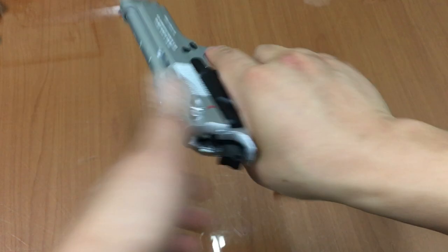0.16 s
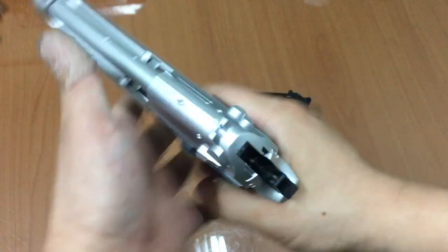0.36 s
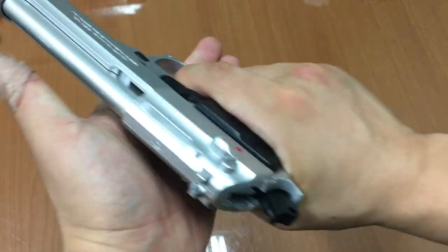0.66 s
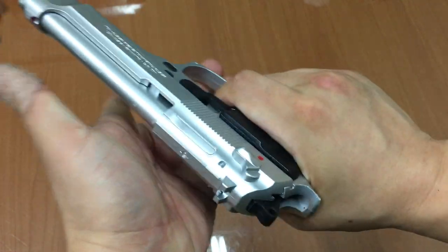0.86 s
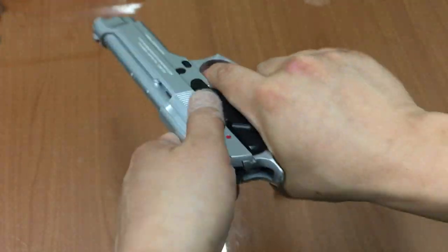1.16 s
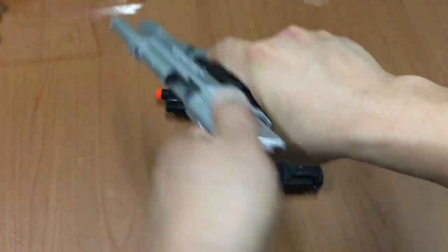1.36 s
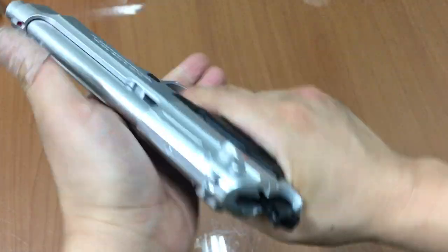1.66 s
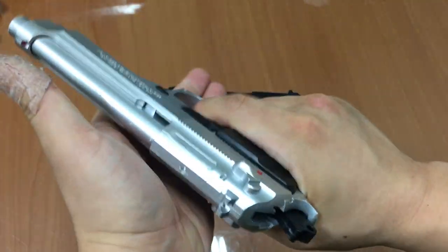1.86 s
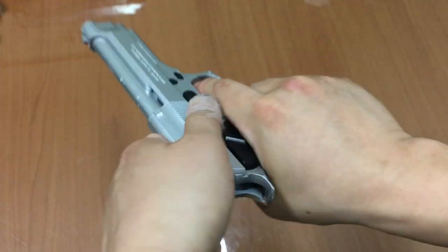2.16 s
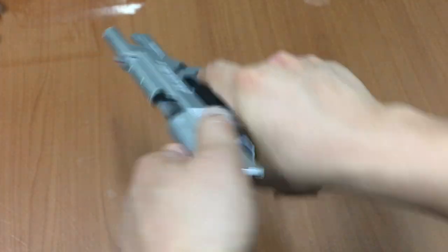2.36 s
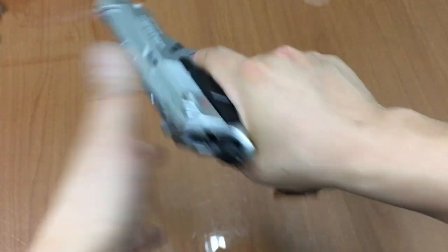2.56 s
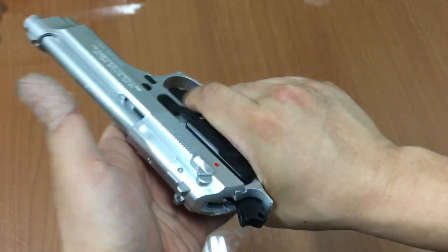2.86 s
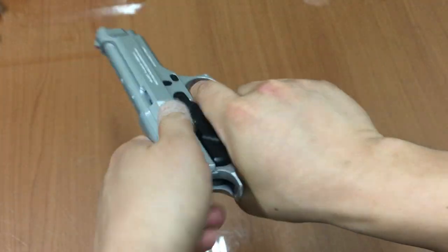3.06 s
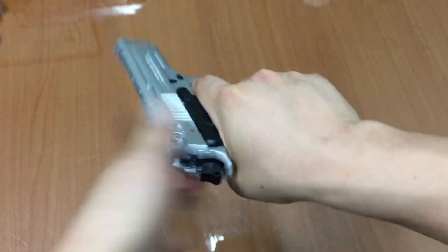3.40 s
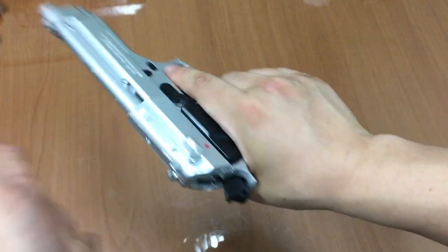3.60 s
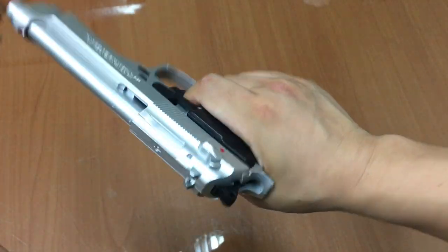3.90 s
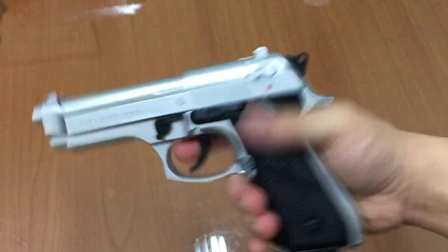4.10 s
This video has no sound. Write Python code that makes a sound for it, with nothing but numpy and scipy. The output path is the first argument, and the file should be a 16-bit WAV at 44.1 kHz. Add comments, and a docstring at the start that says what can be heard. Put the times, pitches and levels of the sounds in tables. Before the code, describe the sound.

Close sharp plastic clacks: slide dragged back, slammed forward, then a trigger click and hammer snap, repeated four times in about four seconds.

```python
"""Spring pistol over a table

A plastic spring airsoft pistol is worked over a table in a small, hard room, close to a camera's microphone.
Four times the slide is dragged back (cocking click, rear stop), slams home, and the trigger drops the hammer.
Contacts ring decaying modes under noise cracks; rubbing is a stream of clicks; hands and room are shaped noise.
The camera's limiter flattens the big clacks and its gain control ducks the room behind them.
"""
import sys
import numpy as np
from scipy import signal
from scipy.fft import rfft, irfft, next_fast_len
from scipy.io import wavfile
from scipy.ndimage import uniform_filter1d, minimum_filter1d, map_coordinates

SR = 44100
rng = np.random.default_rng(int(sys.argv[2]) if len(sys.argv) > 2 else 0)


def unload_audio(sound):
    """Save the sound as a 16-bit wav file, at the path given as the first command line argument."""
    columns = np.transpose(np.atleast_2d(sound))
    # keep every value between -1 and 1, then stretch to whole-number steps
    steps = np.round(np.clip(columns, -1, 1) * 32767)
    wavfile.write(sys.argv[1], SR, steps.astype(np.int16))


N = 187067


def amp(db):
    """Decibels to gain."""
    return 10 ** (np.asarray(db) / 20)


def unit(x):
    """Scaled to rms 1."""
    return x / np.sqrt(np.mean(x ** 2) + 1e-20)


def along(points, hz):
    """Reads (pitch_hz, value) points on a logarithmic pitch axis."""
    point_hz, value = np.transpose(points)
    return np.interp(np.log(hz + 1), np.log(point_hz + 1), value)


def wobble(knots_per_s):
    """A smooth random curve through evenly spaced random knots."""
    knots = rng.standard_normal(int(N * knots_per_s / SR) + 4)
    return map_coordinates(knots, [np.arange(N) * knots_per_s / SR])


def coloured(x, spectrum, size):
    """Filters x to a spectral colour and scales it to rms 1."""
    m = next_fast_len(size)
    gain = amp(along(spectrum, np.fft.rfftfreq(m, 1 / SR)))
    return unit(irfft(rfft(x, m) * gain, m)[:size])


def noise(spectrum, size):
    """Noise of rms 1 with the given colour."""
    return coloured(rng.standard_normal(next_fast_len(size)), spectrum, size)


def add(track, start_s, sound):
    """Mixes a sound into the track at its start time."""
    i = max(0, round(start_s * SR))
    track[i:i + len(sound)] += sound[:max(0, len(track) - i)]


# How long the small room rings at each pitch: pitch_hz, t60_s
ROOM_DECAY = [(300, 0.12), (1000, 0.2), (2000, 0.28), (3200, 0.33), (5000, 0.35), (7000, 0.34),
              (11000, 0.31), (16000, 0.24)]
# How strongly the walls answer at each pitch, relative: pitch_hz, level_db
ROOM_TONE = [(200, 5), (900, 4.5), (2000, 4.5), (7000, 0.5), (16000, 0.5)]


def in_room(x, wet_db, build_s=0.0048):
    """The direct sound plus a diffuse tail that builds up as the walls answer."""
    hz, t, z = signal.stft(rng.standard_normal(SR // 2), SR, nperseg=256)
    decay_db = -60 * t / along(ROOM_DECAY, hz)[:, None]
    gain = amp(along(ROOM_TONE, hz)[:, None] + decay_db)
    tail = signal.istft(z * gain, SR, nperseg=256)[1]
    tail *= 1 - np.exp(-(np.arange(len(tail)) / SR / build_s) ** 2)
    response = amp(wet_db) * tail / np.linalg.norm(tail)
    response[0] += 1  # direct sound
    return signal.fftconvolve(x, response)


def ringing(modes, t, rattle_hz):
    """A part's modes, struck at new strengths; loose parts rattle against it and roughen each line."""
    hz, mode_db, t60_s = np.transpose(modes)[:, :, None]
    strength = amp(mode_db + 2 * rng.standard_normal(hz.shape))
    # a random walk of phase broadens each line to rattle_hz
    steps = rng.standard_normal((len(modes), len(t)))
    drift = np.sqrt(2 * np.pi * rattle_hz / SR) * np.cumsum(steps, axis=1)
    phase = 2 * np.pi * (hz * t + rng.random(hz.shape)) + drift
    lines = strength * amp(-60 * t / t60_s) * np.sin(phase)
    return np.sum(lines, axis=0) / np.linalg.norm(strength)


def contacts(rows, modes, colour, ring_db, rattle_hz, crack_db, crack_t60, snap_db, snap_t60, wet_db):
    """Each contact rings the part's modes under a crack: a sharp snap, then dense, fast-dying overtones."""
    track, t = np.zeros(N), np.arange(SR // 8) / SR
    onset = 1 - np.exp(-t / 0.00092)
    for start_s, ring, crack in rows:
        crack_decay = amp(snap_db - 60 * t / snap_t60) + amp(-60 * t / crack_t60)
        burst = noise(colour, size=len(t)) * crack_decay
        hit = amp(ring + ring_db) * ringing(modes, t, rattle_hz) + amp(crack + crack_db) * burst
        add(track, start_s, in_room(hit * onset, wet_db))
    return track


def play(pattern, events):
    """The contacts (start_s, ring_db, crack_db) of events that all follow one pattern."""
    rows = []
    for start_s, ring_db, crack_db, *_ in events:
        for delay_s, ring, crack in pattern:
            rows.append((start_s + delay_s, ring_db + ring, crack_db + crack))
    return rows


# Colour of the faint air, relative density per Hz: pitch_hz, level_db
AIR_COLOUR = [(15, -30.5), (25, -27), (59, 11), (120, 7.5), (166, -10.5), (217, -7), (301, -13.5),
              (489, -16), (734, -5), (887, -21), (1370, -15), (2910, -50.5), (5280, -39), (14800, -42),
              (16000, -55.5)]
# Colour of the low room rumble, relative density per Hz: pitch_hz, level_db
RUMBLE_COLOUR = [(13, -28), (22, -13), (31, -33), (43, -16.5), (97, 0.5), (119, -4), (156, -3), (197, -2),
                 (302, -10), (326, -9), (422, -15), (480, -28.5), (620, -38), (1060, -120)]
# Hum lines, each at its rms level: pitch_hz, level_db
HUM_LINES = [(50, -48.5), (155, -49), (300, -54)]


def background(rumble_db=-42, air_db=-51):
    """Low room rumble and faint air as shaped noise, and a hum of sines with wavering phase."""
    t = np.arange(N) / SR
    hum = np.zeros(N)
    for hz, level_db in HUM_LINES:
        hum += amp(level_db) * unit(np.sin(2 * np.pi * hz * t + 0.98 * wobble(3.1)))
    rumble = amp(rumble_db + 1.3 * wobble(8)) * noise(RUMBLE_COLOUR, size=N)
    return hum + rumble + amp(air_db) * noise(AIR_COLOUR, size=N)


# Colour of skin on the grip, relative density per Hz: pitch_hz, level_db
SKIN_COLOUR = [(200, -17), (500, 3), (1300, -3), (2200, -9.5), (4000, -17.5), (8000, -24), (16000, -36)]
# the hand closes on the slide before each cocking click
REGRIP_LEAD_S, REGRIP_WIDTH_S, REGRIP_DB = 0.11, 0.11, 3
# the grip tightens before each shot
SQUEEZE_LEAD_S, SQUEEZE_WIDTH_S, SQUEEZE_DB = 0.12, 0.26, 0.5


def hands(rustle_db=-56):
    """Skin brushes the grip as fine-grained noise, more at each regrip and squeeze."""
    t = np.arange(N) / SR
    regrip = sum(np.exp(-((t - cock_s + REGRIP_LEAD_S) / REGRIP_WIDTH_S) ** 2) for cock_s, *_ in COCKS)
    squeeze = sum(np.exp(-((t - shot_s + SQUEEZE_LEAD_S) / SQUEEZE_WIDTH_S) ** 2) for shot_s, *_ in SHOTS)
    grain_db = 1.6 * wobble(90)
    brush_db = rustle_db + REGRIP_DB * regrip + SQUEEZE_DB * squeeze + grain_db
    return amp(brush_db) * noise(SKIN_COLOUR, size=N)


# Colour of the deep rumble, relative density per Hz: pitch_hz, level_db
DEEP_COLOUR = [(15, -31.5), (28, -14.5), (42, -3.5), (60, 3), (90, -15.5), (200, -43), (500, -91)]
# Uneven level of the deep rumble, with dips after clacks from the camera's gain control,
# before the overall trim: start_s, level_db
DEEP_LEVEL = [(0.0, -44.5), (0.16, -38.5), (0.37, -58), (0.57, -41), (1.56, -49), (1.95, -49.5),
              (2.16, -51), (2.23, -50), (2.72, -52), (3.0, -45), (3.07, -65), (3.16, -51), (3.71, -51),
              (3.85, -38), (3.92, -46), (4.24, -45)]


def deep_rumble(trim_db=-2.0):
    """A deep, uneven rumble: low noise that follows a drawn level."""
    level_db = np.interp(np.arange(N) / SR, *np.transpose(DEEP_LEVEL))
    return amp(level_db + trim_db) * noise(DEEP_COLOUR, size=N)


# the rubbing swells up to the cocking click and ends just after the rear stop
PULL_RISE_DB_PER_S, PULL_END_S = 422, 0.012
# the spring speeds the slide up towards the slam; before that the hand eases it forward
RETURN_RISE_DB_PER_S = 814
EASE_DB, EASE_S = -49, 0.1


def rubbing():
    """Strength of the slide's friction: it grows as the slide gathers speed, backwards and then forwards."""
    t, travel = np.arange(N) / SR, np.zeros(N)
    for (cock_s, _, _, rub_db), (stop_s, _, _) in zip(COCKS, STOPS):
        pull = amp(rub_db - PULL_RISE_DB_PER_S * np.maximum(cock_s - t, 0))
        travel += pull * (t < stop_s + PULL_END_S)
    for slam_s, _, _, rub_db in RELEASES:
        ahead_s = np.abs(slam_s - t)
        spring = amp(rub_db - RETURN_RISE_DB_PER_S * ahead_s)
        ease = amp(EASE_DB) * (ahead_s < EASE_S)
        travel += (spring + ease) * (t < slam_s)
    return travel


def rails(slips_per_s=1200, scatter_db=4.5, wet_db=-7):
    """While the slide travels, plastic sticks and slips on plastic in a stream of tiny uneven clicks."""
    happens = rng.random(N) < slips_per_s / SR
    slips = happens * rng.choice([-1, 1], size=N) * amp(scatter_db * rng.standard_normal(N))
    colour = [(300, -25), (1200, -3.5), (1850, 7.0), (2400, 2), (3200, 1.5),
              (4300, 0.0), (6800, -2.5), (11000, -7), (16000, -14)]  # pitch_hz, level_db
    scrape = coloured(slips, colour, N)
    return in_room(rubbing() * scrape, wet_db)[:N]


# Levels of all contacts below are relative: each part adds its own ring and crack level.
# Each pull of the slide cocks the hammer: start_s, ring_db, crack_db, rub_db
COCKS = [(0.0102, -12, -19.5, -34), (1.3426, -18, -25, -41.5), (2.3861, -20, -31, -43),
         (3.2982, -17, -21, -39.5)]
# The slide touches the hammer and snaps it onto the sear: delay_s, ring_db, crack_db
COCKING_PATTERN = [(-0.0033, -11, -10), (0, 1, 0)]
# The slide meets the rear stop: start_s, ring_db, crack_db
STOPS = [(0.0567, -18, -17.5), (1.3899, -15, -12), (2.4696, -17.5, -16), (3.3406, -22, -16)]
# A first touch, then the stop: delay_s, ring_db, crack_db
STOP_PATTERN = [(-0.0042, -3, -5.5), (0, 1.5, 3)]
# The slide catches on its way: start_s, ring_db, crack_db
CATCHES = [(0.1902, -28, -36), (1.2759, -39, -69), (1.303, -38, -48), (1.3726, -42.5, -28.5),
           (1.515, -28, -47.5), (2.315, -46, -58), (2.336, -41, -51), (2.4165, -30, -56),
           (2.4493, -34.5, -34), (3.2523, -44, -60), (3.3273, -24, -31), (3.435, -31.5, -42)]
# Modes rung at the rear stop, the cocking and the catches: pitch_hz, level_db, t60_s
STOP_MODES = [(804, -33.5, 0.026), (1354, -13, 0.051), (1500, -3, 0.017), (1790, 9.5, 0.014),
              (1996, -4.5, .025), (2422, 2.5, 0.013), (2850, 4, 0.021), (3038, 0.5, 0.023),
              (3440, -7, 0.013)]
# Colour of their crack, relative density per Hz: pitch_hz, level_db
STOP_CRACK = [(200, -12), (550, -36.5), (900, -9.5), (2000, -0.5), (3200, 6.5), (4400, -3), (6500, 2.5),
              (9300, -3.5), (10700, -8.5), (16000, -9.5)]


def slide_back():
    """The slide cocks the hammer, catches here and there and meets its rear stop, ringing short modes."""
    rows = play(COCKING_PATTERN, COCKS) + play(STOP_PATTERN, STOPS) + CATCHES
    return contacts(rows, STOP_MODES, STOP_CRACK, ring_db=8.0, rattle_hz=79, crack_db=4.0,
                    crack_t60=0.021, snap_db=6, snap_t60=0.005, wet_db=-12)


# The slide is let go and slams home: start_s, ring_db, crack_db, rub_db
RELEASES = [(0.2269, -6.5, -15, -31.5), (1.5292, -6.5, -16.5, -31), (2.6078, -5, -11, -31.5),
            (3.486, -13, -22, -27.5)]
# It rebounds and seats: start_s, ring_db, crack_db
SEATINGS = [(0.238, -14.5, -13.5), (1.542, -17, -14), (2.6175, -12, -11.5), (3.4908, -8, -11)]
# The slide chatters into place: delay_s, ring_db, crack_db
SEATING_PATTERN = [(0, 1.5, 0.91), (0.0038, -0.5, -1), (0.0098, -11, -2.2)]
# Modes of the slide: pitch_hz, level_db, t60_s
SLIDE_MODES = [(796, -25, 0.052), (1340, -14.5, 0.036), (1923, -12, 0.033), (2536, -6, .03),
               (2715, -6.5, 0.017), (3103, -3, 0.06), (3173, -3.5, 0.04), (3253, 2.5, 0.039),
               (3322, -5.5, 0.052), (3444, -8.5, .025), (5030, -32.5, .03), (6000, -35, .03)]
# Colour of its crack, relative density per Hz: pitch_hz, level_db
SLIDE_CRACK = [(200, -46.5), (500, -26), (1000, -17), (1500, -2), (2500, -2.5), (4200, -3.5), (6200, 2.5),
               (7800, -3.5), (9700, -2), (10500, -9), (16000, -9)]


def slide_home():
    """The spring slams the slide home, ringing its modes; it rebounds and seats."""
    rows = [slam[:3] for slam in RELEASES] + play(SEATING_PATTERN, SEATINGS)
    return contacts(rows, SLIDE_MODES, SLIDE_CRACK, ring_db=9.0, rattle_hz=39.5, crack_db=7.0,
                    crack_t60=0.04, snap_db=2.0, snap_t60=0.0041, wet_db=-7.5)


# Light ticks of trigger and grip taking up slack or springing back: start_s, ring_db, crack_db
TICKS = [(0.4775, -23.5, -34), (0.4816, -28, -27.5), (0.5361, -48, -44), (0.5808, -51, -53),
         (0.6951, -64, -55.5), (0.8572, -66, -55), (1.0987, -29, -21.5), (2.1764, -32.5, -21),
         (2.9346, -58, -52), (3.1395, -29.5, -23.5), (3.8584, -55, -45), (4.0829, -29.5, -21),
         (4.2082, -42, -51)]
# The sear creeps off its notch ahead of a shot: delay_s, ring_db, crack_db
SEAR_SLIP = [(-0.0185, -20.5, -20.5), (-0.0085, -20.5, -19)]
# Modes of the sear and trigger: pitch_hz, level_db, t60_s
SEAR_MODES = [(1130, 9.5, 0.0055), (1707, 1, 0.017), (2210, -3, 0.028), (2506, -3.5, 0.022),
              (3380, -2.5, 0.027), (7200, -15.5, 0.0086)]
# Colour of their crack, relative density per Hz: pitch_hz, level_db
SEAR_CRACK = [(300, -29), (1000, -19.5), (3000, -5), (5500, 2.5), (7200, 4), (9000, -0.5), (12000, -3),
              (16000, -10.5)]


def trigger():
    """Trigger and grip tick lightly, and the sear slips just before each shot, under sharp snaps."""
    rows = TICKS + play(SEAR_SLIP, SHOTS)
    return contacts(rows, SEAR_MODES, SEAR_CRACK, ring_db=8, rattle_hz=61, crack_db=-2,
                    crack_t60=0.026, snap_db=12, snap_t60=0.0047, wet_db=-11)


def kick(blows, push_db=-2, push_s=0.00091):
    """Every hammer blow also shoves the whole frame in the hand: one low push and its return."""
    track, u = np.zeros(N), np.arange(SR // 20) / SR / push_s
    for start_s, ring_db, _ in blows:
        add(track, start_s, amp(ring_db + push_db) * u * (2 - u) * np.exp(-u))
    return track


# The trigger drops the hammer: start_s, ring_db, crack_db
SHOTS = [(0.902, -14, -19), (1.9946, -11, -18), (2.9991, -13.5, -18), (3.8932, -15, -17)]
# The hammer chatters, then bounces twice: delay_s, ring_db, crack_db
HAMMER_PATTERN = [(0, -11.5, -6.5), (0.002, 0.5, 6), (0.005, -3, -1), (0.0085, -6.5, 2.5),
                  (0.0207, 0, -5.5), (0.0305, -11.5, -13)]
# Modes of the frame: pitch_hz, level_db, t60_s
FRAME_MODES = [(602, -12.5, 0.035), (695, -14.5, 0.034), (751, -6.5, 0.029), (940, -14, 0.014),
               (1309, -14.5, 0.041), (1439, -5.5, 0.036), (1580, 0, 0.03), (1750, -3, 0.035),
               (1975, -6.5, 0.02), (2730, -6.5, 0.0098), (3241, -4.5, 0.05), (4460, -25, 0.019)]
# Colour of its crack, relative density per Hz: pitch_hz, level_db
FRAME_CRACK = [(150, 1), (450, -38), (800, -7), (1100, -0.5), (1600, 5), (4000, 0.5), (6500, 2),
               (9500, -2.5), (10700, -6), (16000, -7.5)]


def hammer():
    """The hammer falls and rings the frame, chattering and bouncing in the same pattern at every shot."""
    rows = play(HAMMER_PATTERN, SHOTS)
    clack = contacts(rows, FRAME_MODES, FRAME_CRACK, ring_db=9.5, rattle_hz=6.5, crack_db=8,
                     crack_t60=0.033, snap_db=3.0, snap_t60=0.011, wet_db=-7.5)
    return kick(rows) + clack


def scene():
    """The room, the hands, the deep rumble, the pistol's rubbing and its four kinds of contact."""
    steady = background() + hands() + deep_rumble()
    pistol = rails() + slide_back() + slide_home() + trigger() + hammer()
    return (steady + pistol)[None]


def held_gain(x, ceiling_db, hold_s, ramp_s):
    """The gain that keeps peaks under a ceiling, held for a while and then eased."""
    needed = np.minimum(1, amp(ceiling_db) / (np.abs(x) + 1e-9))
    hold, ramp = int(hold_s * SR / 2), int(ramp_s * SR / 2)
    # both windows look back: the gain drops at once and recovers late
    held = minimum_filter1d(needed, 2 * hold + 1, origin=hold)
    return np.minimum(held, uniform_filter1d(held, 2 * ramp + 1, origin=ramp))


TOP_HZ = 15900  # upper edge of the band


def record(dry, duck_share=0.49):
    """A slow gain control that takes part of the load, a fast limiter, and the band limit."""
    slow = held_gain(dry, ceiling_db=-7, hold_s=0.17, ramp_s=0.069) ** duck_share
    ducked = dry * uniform_filter1d(slow, size=64)
    fast = held_gain(ducked, ceiling_db=-3.5, hold_s=0.0016, ramp_s=0.0012)
    limited = ducked * uniform_filter1d(fast, size=5)
    band = signal.ellip(10, .1, 80, TOP_HZ, fs=SR, output="sos")
    return signal.sosfilt(band, limited)


dry = scene()
out = record(dry)
unload_audio(out)
```